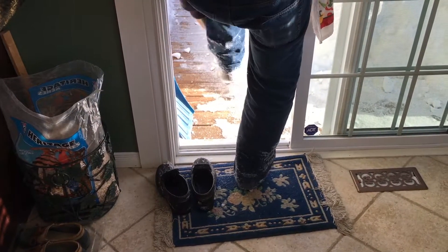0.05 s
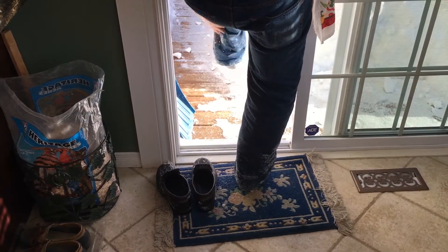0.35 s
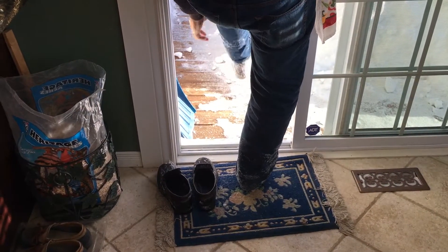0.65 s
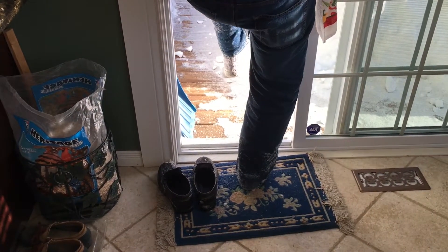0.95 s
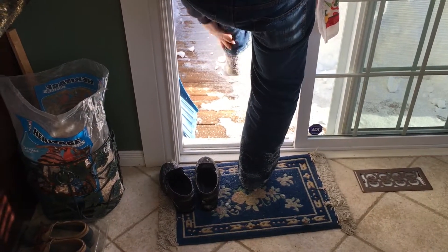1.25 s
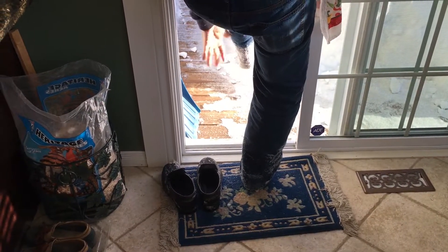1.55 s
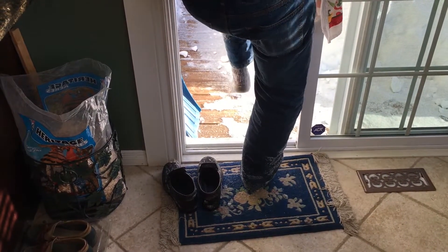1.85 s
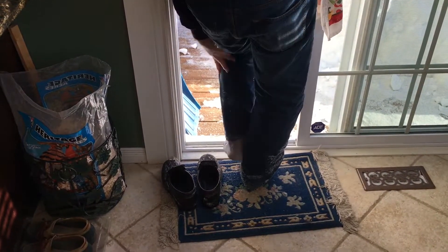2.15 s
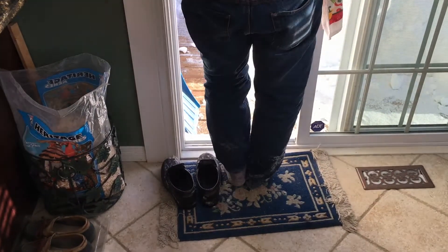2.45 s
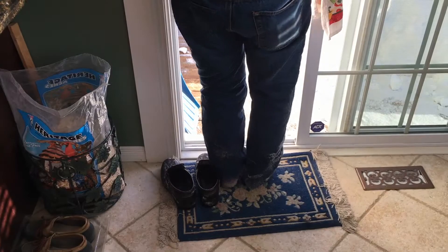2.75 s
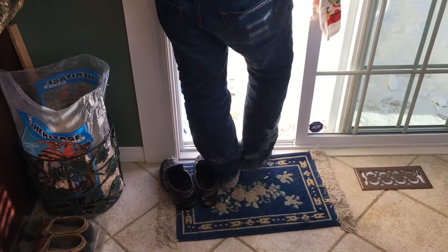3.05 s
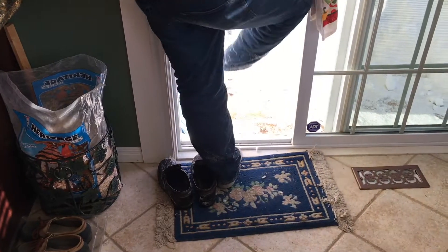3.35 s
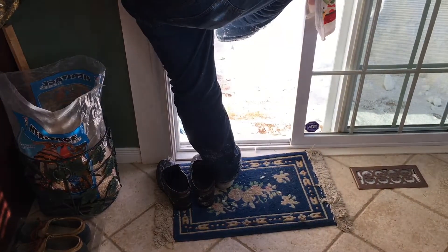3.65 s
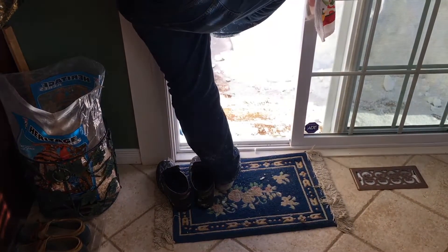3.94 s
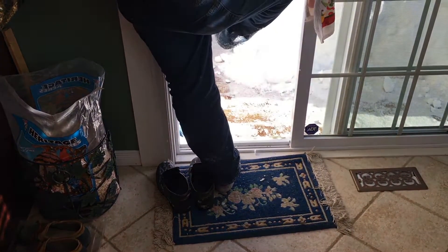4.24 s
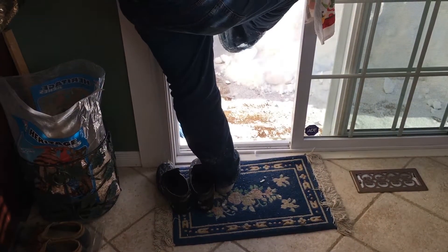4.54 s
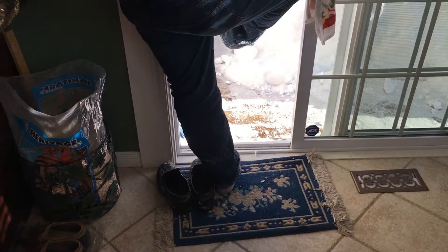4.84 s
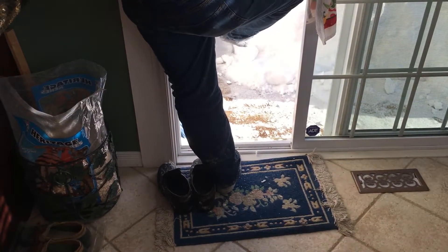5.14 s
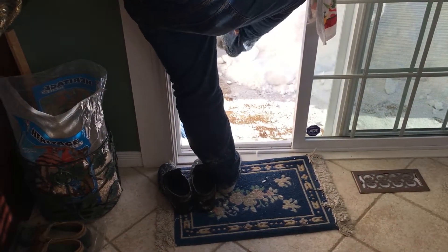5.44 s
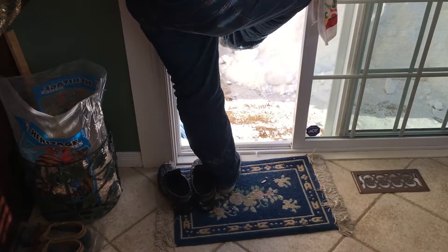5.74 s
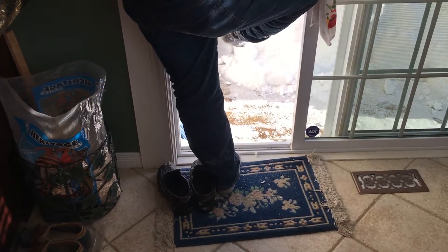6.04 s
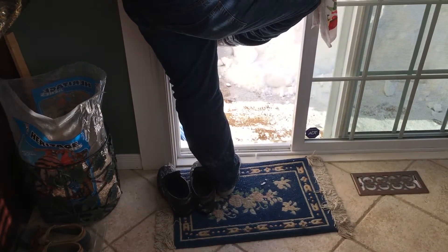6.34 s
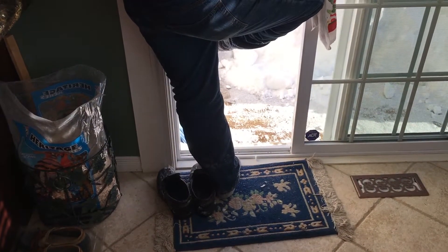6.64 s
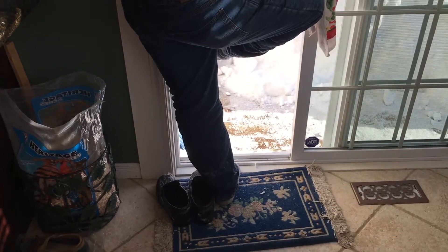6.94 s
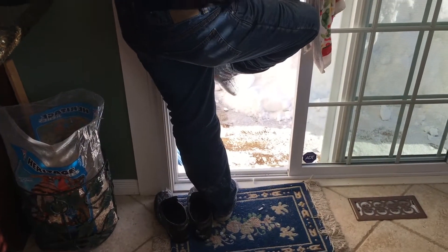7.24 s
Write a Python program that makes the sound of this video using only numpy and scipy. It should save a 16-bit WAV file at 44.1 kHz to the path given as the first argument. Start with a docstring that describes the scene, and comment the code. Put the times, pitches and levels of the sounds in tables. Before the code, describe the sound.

Uneven hand slaps on denim and short cloth rubs, with one low heel thump, over a faint electrical hum indoors.

```python
"""Patting snow off jeans

Someone on one leg on a doormat at an open patio door pats and brushes snow off socks and jeans.
In each pat the fingertips land, the palm thuds on the leg and the hand slides off with a rasp.
The standing foot keeps its balance with soft bumps; once its heel thumps the floor.
A small tiled room rings after each blow, over a low mains hum and a faint hiss."""
import sys
import numpy as np
from scipy import signal
from scipy.fft import rfft, irfft
from scipy.io import wavfile

SR = 44100
rng = np.random.default_rng(int(sys.argv[2]) if len(sys.argv) > 2 else 0)


def generate_wav(sig):
    """Save sig (samples, or channels by samples) to the path in sys.argv[1] as 16-bit PCM at SR."""
    pcm = np.round(np.clip(np.atleast_2d(sig).T, -1, 1) * 32767).astype(np.int16)
    wavfile.write(sys.argv[1], SR, pcm)


N = 321489
T = np.arange(N) / SR

# Hand blows on the leg. Each row: time in s, slap in dB, contact in s, air pocket pitch in Hz,
# fingertips in dB, thud in dB, time to full sliding speed in s, slide in dB. Levels are relative.
PATS = [(.006, -52, 0.0086, 655, -66, -45, 0.042, -59.5), (.271, -50.5, 0.0094, 1000, -51, -46, 0.19, -68),
        (.646, -50.5, 0.0034, 650, -82, -59.5, 0.025, -84), (.964, -41, 0.0063, 710, -59, -38, 0.069, -57),
        (1.029, -43, 0.0076, 835, -69, -58, .03, -69), (1.21, -44.5, 0.0057, 756, -41, -43.5, 0.062, -56.5),
        (1.307, -45, 0.0057, 800, -68, -50, 0.024, -66), (1.451, -33, 0.0034, 1120, -63, -40, 0.046, -59),
        (1.651, -45, 0.0042, 620, -44.5, -45.5, 0.027, -55.5),
        (1.893, -37.5, 0.006, 920, -50, -43.5, 0.045, -56.5),
        (2.118, -45.5, 0.0043, 425, -41.5, -45.5, .052, -58),
        (3.92, -53, 0.0065, 430, -60, -64, 0.084, -57), (4.268, -45, 0.01, 780, -69, -47, 0.091, -57),
        (4.586, -59, 0.01, 440, -76, -53, 0.084, -60),
        (4.942, -50.5, 0.0063, 1320, -59, -47.5, 0.049, -64.5),
        (5.092, -55, 0.0082, 677, -59, -53, 0.017, -61), (5.305, -42, 0.004, 590, -77, -48, 0.077, -65.5),
        (5.416, -42.5, 0.0026, 450, -66, -61, 0.017, -65),
        (6.936, -62.5, 0.0079, 1120, -74, -57.5, 0.14, -79.5)]


def undb(db):
    """Decibels to gain."""
    return 10 ** (np.asarray(db) / 20)


def unit(x):
    """Scale to rms 1."""
    return x / np.sqrt(np.mean(x ** 2))


def convolve(x, response):
    """Apply an impulse response."""
    return signal.fftconvolve(x, response)[:N]


def colour(x, points, size=8192):
    """Minimum-phase filter through (Hz, dB) points; keeps the power of white noise."""
    hz, db = np.transpose(points)
    bins_hz = np.maximum(np.fft.rfftfreq(size, 1 / SR), 1)
    gain = undb(np.interp(np.log(bins_hz), np.log(hz), db))
    cepstrum = irfft(np.log(gain))
    cepstrum[1:size // 2] *= 2
    cepstrum[size // 2 + 1:] = 0
    response = irfft(np.exp(rfft(cepstrum)))
    return convolve(x, response / np.linalg.norm(response))


def walk(rate_hz):
    """Random drift, spread near 1."""
    knots = rng.standard_normal(size=16384)
    return np.interp(T * rate_hz, np.arange(len(knots)), knots)


def grains(per_s, scatter_db=2.7):
    """Tiny fibre slips of uneven size, rms 1."""
    sizes = rng.standard_normal(N) * undb(scatter_db * rng.standard_normal(N))
    return unit(sizes * (rng.random(N) < per_s / SR))


def swell(t, peak_s, steep):
    """Envelope: starts at t = 0, reaches 1 at peak_s, dies away."""
    u = np.maximum(t, 0) / peak_s
    return (u * np.exp(1 - u)) ** steep


def add(track, start_s, sound):
    """Mix a short sound into a track."""
    start = int(start_s * SR)
    part = sound[max(-start, 0):N - start]
    track[max(start, 0):max(start, 0) + len(part)] += part


def contacts(finger_s=0.0026, finger_hz=1820, foot_s=0.0042, foot_hz=343, tick_db=-12):
    """Fingertip, palm and foot contacts: time s, slap dB, contact s, air Hz, tick dB, thud tones."""
    # Thud tones of the leg. Each row: pitch in Hz, gain in dB.
    leg_tones = [(92, -2), (190, -1.5)]
    # The foot shifts its weight on the mat. Each row: time in s, thud in dB, pitch in Hz.
    foot_bumps = [(0.056, -50.5, 74), (1.086, -43, 191), (1.117, -44, 132), (1.139, -56, 143),
                  (1.678, -50.5, 157), (2.190, -51, 194), (2.849, -58.5, 94.5), (3.408, -57, 194),
                  (3.571, -57, 123), (3.675, -53.5, 90), (4.553, -46, 65.4), (4.586, -45, 68),
                  (5.324, -48, 75), (6.35, -60.5, 132)]
    for at_s, slap_db, contact_s, air_hz, finger_db, thud_db, _, _ in PATS:
        lead_s = 1.45 * contact_s
        yield at_s - lead_s, finger_db - 2.5, finger_s, finger_hz, finger_db, []
        tones = [(hz, thud_db + gain_db) for hz, gain_db in leg_tones]
        yield at_s, slap_db, contact_s, air_hz, slap_db + tick_db, tones
    for at_s, thud_db, hz in foot_bumps:
        slap_db = thud_db - 11.5
        yield at_s, slap_db, foot_s, foot_hz, slap_db + tick_db, [(hz, thud_db)]


def pats(thud_rise_cycles=0.78):
    """Contacts squeeze out air with a hollow pop; snow and fibres tick; the leg or mat thuds."""
    # Spectra of the slap and the ticks. Each row: frequency in Hz, relative level in dB.
    slap_spectrum = [(100, -21.5), (220, -5), (380, 0.5), (490, -3), (660, -0.5), (850, -3), (1100, -6),
                     (1500, -9.5), (2300, -15.5), (4000, -23), (14000, -55)]
    tick_spectrum = [(800, 9.5), (2000, 8.5), (4000, 2), (6500, 2), (7500, -2.5), (8800, 2.5), (10400, -4),
                     (12500, 0.5), (16000, -2)]
    slap, pop, tick_envelope, thud = np.zeros((4, N))
    t = T[:SR // 4]
    mid_s = t.mean()
    for at_s, slap_db, contact_s, air_hz, tick_db, tones in contacts():
        # Loose cloth yields first, so pressure builds ahead of the blow.
        pressure = np.exp(-np.abs((t - mid_s) / contact_s) ** 1.13)
        add(slap, at_s - mid_s, undb(slap_db) * pressure)
        add(tick_envelope, at_s - mid_s, undb(tick_db) * pressure)
        # The air pocket leaks through the weave: only a few cycles ring.
        period_s = 1 / air_hz
        pocket = swell(t, period_s, steep=0.84) * np.sin(2 * np.pi * air_hz * t)
        add(pop, at_s - period_s, undb(slap_db) * pocket)
        for hz, db in tones:
            tone = swell(t, thud_rise_cycles / hz, steep=1.03) * np.sin(2 * np.pi * hz * t)
            add(thud, at_s - contact_s / 2, undb(db) * tone)
    slap_noise = colour(slap * rng.choice([-1, 1], N), slap_spectrum)
    ticks = colour(tick_envelope * grains(per_s=6800), tick_spectrum)
    return undb(-2) * slap_noise + undb(1) * pop + ticks + thud


def rubs():
    """Slides after pats, then free strokes: peak s, rise s, fall s, rasp dB, rumble dB, fibre dB."""
    # Rubs without a blow. Each row: time of full speed in s, half length in s,
    # relative rasp level in dB, rumble and fibre hiss in dB over the rasp.
    free_strokes = [(0.084, 0.018, -68.5, 12, 13.5), (1.977, 0.0099, -61.5, 7, 4),
                    (2.075, 0.067, -64.5, 2.5, -1), (2.174, 0.035, -63, -7, 9.5),
                    (2.271, 0.068, -64.5, 0, 2.5), (2.403, 0.052, -64.5, 1.5, -2),
                    (2.656, 0.16, -75, -5, 3.5), (2.967, 0.094, -68, 0, -5), (3.069, 0.061, -58, -5, -3),
                    (3.363, .13, -73, 1.5, 2.5), (3.63, 0.062, -56, 1.5, -1.5), (5.06, 0.042, -63, 0.5, 0),
                    (5.835, .05, -71, 2.5, 0), (6.15, 0.13, -70, 0.5, 1), (6.35, 0.071, -73, 2, 8),
                    (6.685, 0.042, -68.5, -17, 6), (7.006, 0.079, -72, -11, 5.5)]
    for at_s, *_, slide_s, db in PATS:
        yield at_s + slide_s, 0.86 * slide_s, 0.5 * slide_s, db, db + 4.5, db + 1
    for at_s, half_s, db, rumble_db, fibre_db in free_strokes:
        yield at_s, half_s, half_s, db, db + rumble_db, db + fibre_db


def strokes(gain_db=-1, catch_db=1.0, catch_hz=170):
    """Hand and denim catch and slip over cloth; pressure adds a low rumble."""
    # Spectra of the friction. Each row: frequency in Hz, relative level in dB.
    rasp_spectrum = [(200, -8), (600, -8), (1200, 1.5), (2200, -1), (3500, -2.5), (5500, -14.5),
                     (9000, -16.5), (16000, -36)]
    rumble_spectrum = [(35, -12.5), (70, 3.5), (200, 0.5), (340, -3), (490, -4.5), (680, -5), (1100, -8.5),
                       (2200, -32.5), (8000, -62)]
    fibre_spectrum = [(1500, -29), (4000, -2), (6300, 0.5), (7500, -3), (8800, 0), (10400, -4),
                      (12500, 0.5), (16000, -7)]
    power = np.zeros((3, N))
    for peak_s, rise_s, fall_s, *levels_db in rubs():
        t = np.arange(-2 * rise_s, 4 * fall_s, 1 / SR)
        speed = np.where(t < 0, np.exp(-(t / rise_s) ** 2), 1 / np.cosh(np.pi / 2 * t / fall_s))
        for track, db in zip(power, levels_db):
            add(track, peak_s - 2 * rise_s, (undb(db) * speed) ** 2)
    rasp, rumble, fibre = np.sqrt(power) * undb(gain_db + catch_db * walk(catch_hz))
    return (colour(rasp * grains(per_s=7000), rasp_spectrum)
            + colour(rumble * grains(per_s=6000), rumble_spectrum)
            + colour(fibre * grains(per_s=22000), fibre_spectrum))


def heel(at_s=5.406, gain_db=-2.5, settle_s=0.066, settle_db=-19):
    """A padded heel drops on the mat, then the sole settles; the floor booms, falling in pitch."""
    # Floor waves, deepest last. Each row: pitch in Hz, relative peak in dB, time to peak in s.
    floor_waves = [(280, -29, 0.00817), (189, -22, 0.01194), (128, -29.5, 0.0184), (89, -25, 0.0221),
                   (59.8, -21.5, 0.041)]

    def boom(t):
        return sum(undb(db) * swell(t, peak_s, steep=4) * np.cos(2 * np.pi * hz * (t - peak_s))
                   for hz, db, peak_s in floor_waves)
    return undb(gain_db) * (boom(T - at_s) + undb(settle_db) * boom(T - at_s - settle_s))


def denim_ribs(spread_hz=700):
    """Uneven ribs slide over each other and sing faintly; pitch rises with sliding speed."""
    # Leg shifts. Each row: centre in s, half length in s, pitch in Hz, glide in octaves/s, level in dB.
    shifts = [(3.064, .05, 1884, 2.1, -66), (6.265, 0.03, 2390, 1.2, -69)]
    song = np.zeros(N)
    for at_s, half_s, hz, octaves_per_s, db in shifts:
        t = np.clip(T - at_s, -3 * half_s, 3 * half_s)
        phase = 2 * np.pi * np.cumsum(hz * 2 ** (octaves_per_s * t)) / SR
        rough_tone = walk(spread_hz) * np.sin(phase) + walk(spread_hz) * np.cos(phase)
        song += undb(db) * np.exp(-(t / half_s) ** 2) * rough_tone
    return song


def rustles(half_s=0.0065):
    """Folds of cloth crease with a fine, bright crackle."""
    # Creases. Each row: time in s, level in dB.
    creases = [(1.024, -50), (3.022, -57), (3.184, -63), (4.127, -55), (4.206, -61), (4.374, -51),
               (5.085, -57), (5.55, -61), (5.8, -68)]
    # Crackle spectrum. Each row: frequency in Hz, relative level in dB.
    spectrum = [(4000, -19), (8000, -16), (10500, -13), (13000, -7), (16000, -9)]
    envelope = sum(undb(db) * np.exp(-((T - at_s) / half_s) ** 2) for at_s, db in creases)
    return colour(envelope * grains(per_s=7400), spectrum)


def room(x, wet_db=-6, low_t60_s=0.54, high_t60_s=0.34, split_hz=2200, first_echo_s=0.0036):
    """Direct sound, standing waves and a diffuse tail whose treble dies first."""
    # Modes of the room and its tiled corner. Each row: frequency in Hz, gain in dB, T60 in s.
    room_modes = [(53.8, 3.5, 0.5), (86.5, 0.5, 0.99), (132.4, 3.5, 0.59), (162.7, -1.5, 0.69),
                  (181.2, -3.5, 0.55), (204.5, 1.5, 0.56), (218.8, 4, 0.26), (256, 3, .65),
                  (278.5, 2, 0.76), (308, -25, 1), (324, -2, 0.89)]
    corner_modes = [(344, -12, 0.29), (408.6, -1, 0.3), (635, -7, .35), (655, 2, 0.28), (739, -5, 0.21),
                    (1035, -5, 0.19), (1107, -9, 0.45), (1220, -6, 0.23), (1270, -11, .3), (1390, -4, 0.31)]
    # Spectrum of the wall reflections. Each row: frequency in Hz, relative level in dB.
    wall_spectrum = [(90, -28.5), (200, -10.5), (340, 1), (500, -5), (700, -2), (1150, -1), (1600, -0.5),
                     (2500, 3.5), (6000, 0), (16000, -3)]
    t = T[:SR]
    noise = rng.standard_normal(SR)
    low = signal.sosfilt(signal.butter(2, split_hz, fs=SR, output="sos"), noise)
    tail = low * undb(-60 * t / low_t60_s) + (noise - low) * undb(-60 * t / high_t60_s)
    tail *= np.clip(t / first_echo_s - 1, 0, 1)
    diffuse = colour(convolve(x, tail / np.linalg.norm(tail)), wall_spectrum)
    standing = np.zeros(SR)
    for hz, db, t60_s in room_modes + corner_modes:
        damping = np.log(1000) / t60_s
        standing += undb(db) * 2 * damping / SR * np.exp(-damping * t) * np.sin(2 * np.pi * hz * t)
    return x + undb(wet_db) * diffuse + convolve(x, standing)


def background(air_db=-66.5, waver_db=0.1, hum_drift_rad=0.17, whine_drift_rad=0.86):
    """Wavering mains hum, thin unsteady electrical whine, narrow bands of hiss and room air."""
    # Hum and whine tones. Each row: frequency in Hz, rms level in dB.
    hum_tones = [(59.4, -60.5), (119.6, -74), (200, -78)]
    whine_tones = [(1700, -85), (3163, -83)]
    # Hiss bands. Each row: centre in Hz, width in Hz, rms level in dB.
    hiss_bands = [(1622, 51, -81), (3160, 260, -75.5), (3420, 140, -82), (4950, 290, -79), (6590, 380, -81)]
    # Room air spectrum. Each row: frequency in Hz, relative level in dB.
    air_spectrum = [(20, 15), (42, 8.5), (58, 21.5), (85, 7.5), (135, 4.5), (200, 11), (300, 6), (500, 1),
                    (1200, -1.5), (2400, -7.5), (4500, -18.5), (9000, -9.5), (10400, -10.5), (14000, -10)]
    hum, whine, hiss = np.zeros((3, N))
    for hz, db in hum_tones:
        amplitude = np.sqrt(2) * undb(db - waver_db * walk(rate_hz=4.2))
        hum += amplitude * np.sin(2 * np.pi * hz * T + hum_drift_rad * walk(rate_hz=3.3))
    for hz, db in whine_tones:
        whine += np.sqrt(2) * undb(db) * np.sin(2 * np.pi * hz * T + whine_drift_rad * walk(rate_hz=60))
    for hz, width_hz, db in hiss_bands:
        band = signal.iirpeak(hz, hz / width_hz, fs=SR)
        hiss += undb(db) * unit(signal.lfilter(*band, rng.standard_normal(N)))
    air = undb(air_db) * colour(rng.standard_normal(N), air_spectrum)
    return hum + whine + hiss + air


def scene():
    """Pats, cloth and heel in the room, over the background; mono."""
    person = pats() + strokes() + denim_ribs() + rustles() + heel()
    return (room(person) + background())[None]


def record(dry, low_hz=43, top_hz=15750):
    """Cut the deepest bass and the top treble."""
    highpass = signal.butter(5, low_hz, "highpass", fs=SR, output="sos")
    lowpass = signal.ellip(12, 0.2, 70, top_hz, fs=SR, output="sos")
    return signal.sosfilt(lowpass, signal.sosfilt(highpass, dry))


dry = scene()
out = record(dry)
generate_wav(out)
```